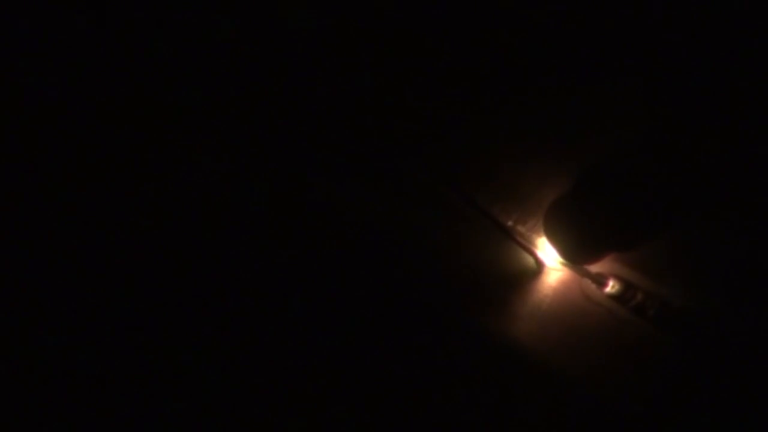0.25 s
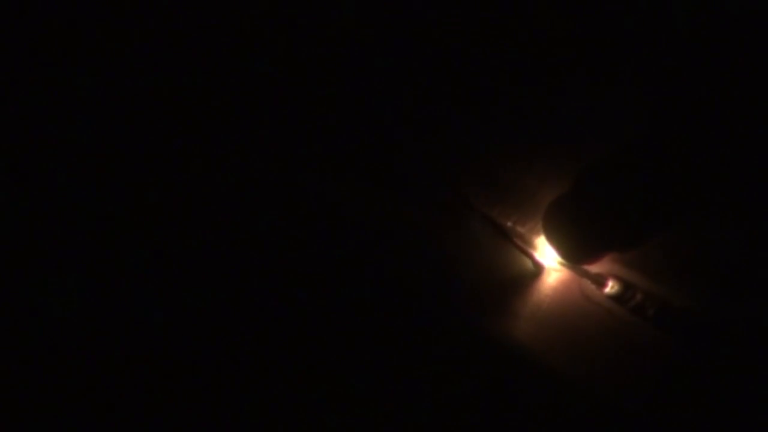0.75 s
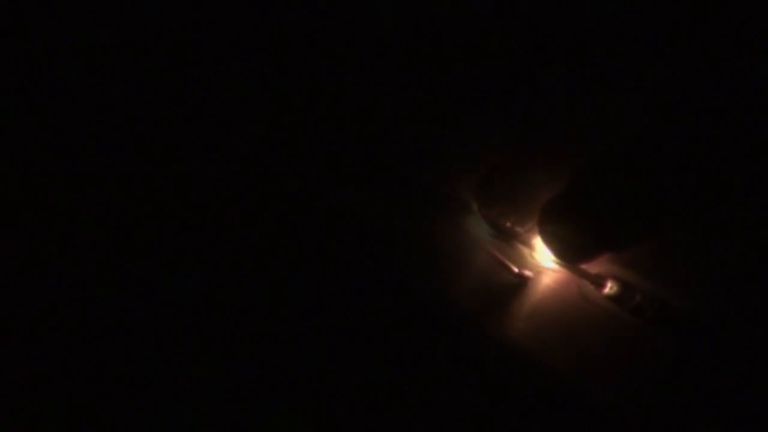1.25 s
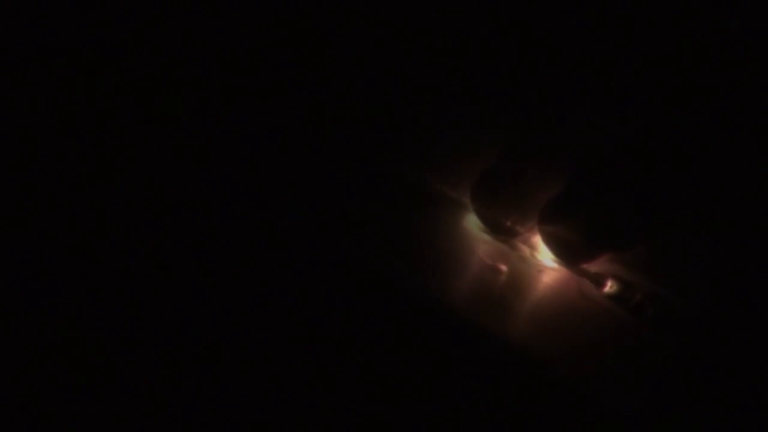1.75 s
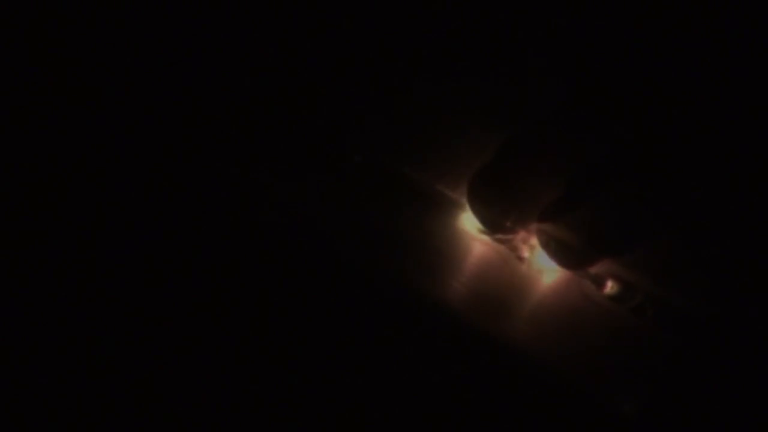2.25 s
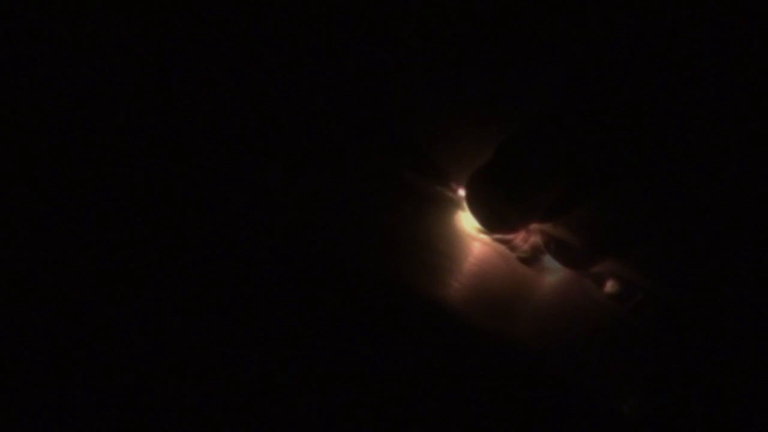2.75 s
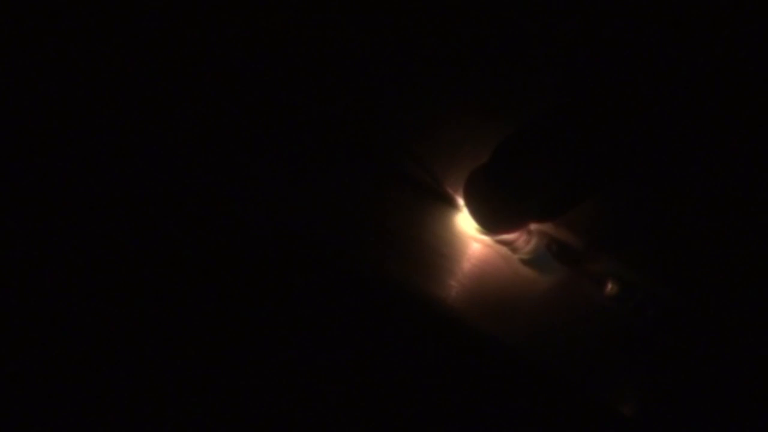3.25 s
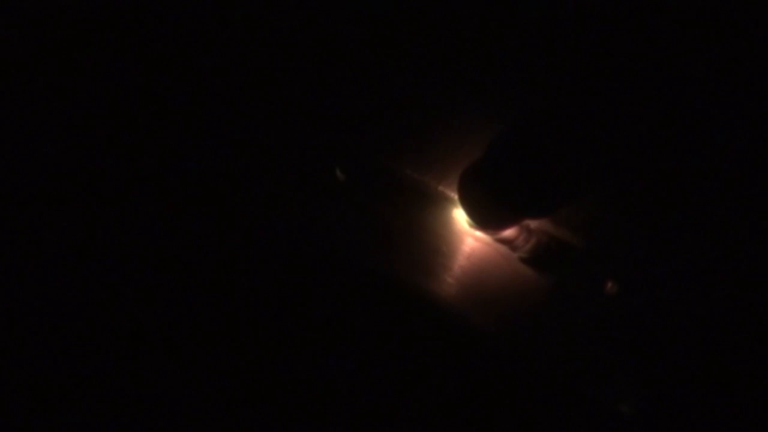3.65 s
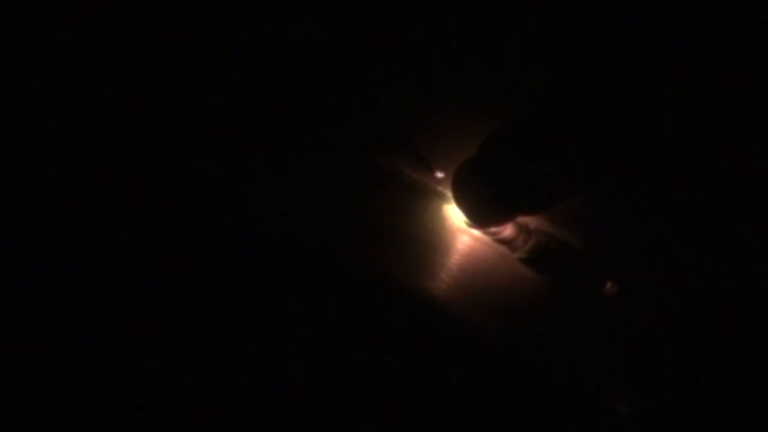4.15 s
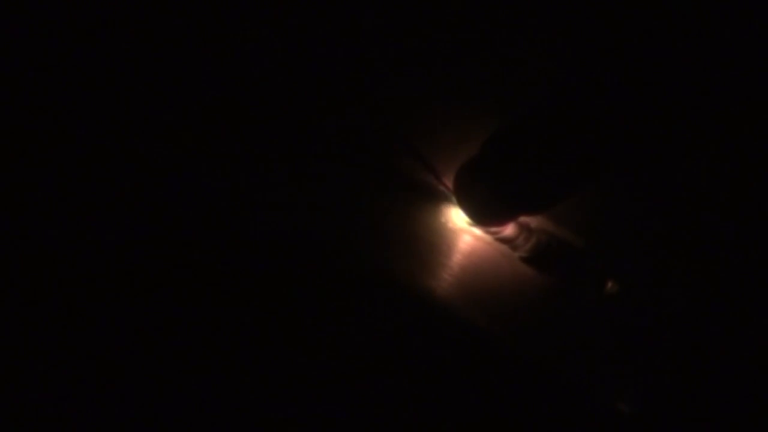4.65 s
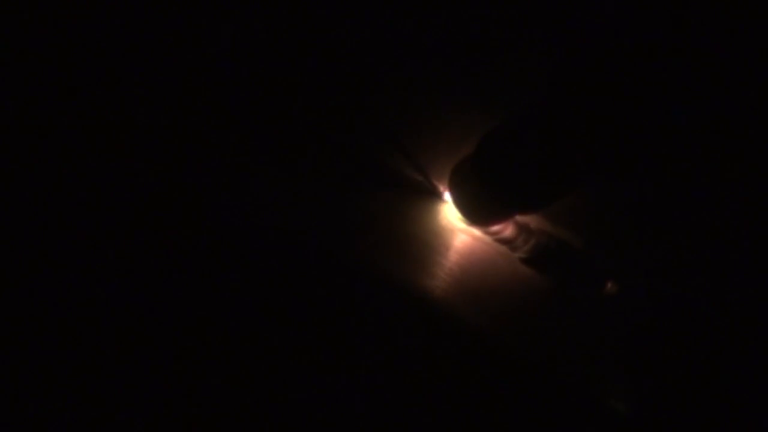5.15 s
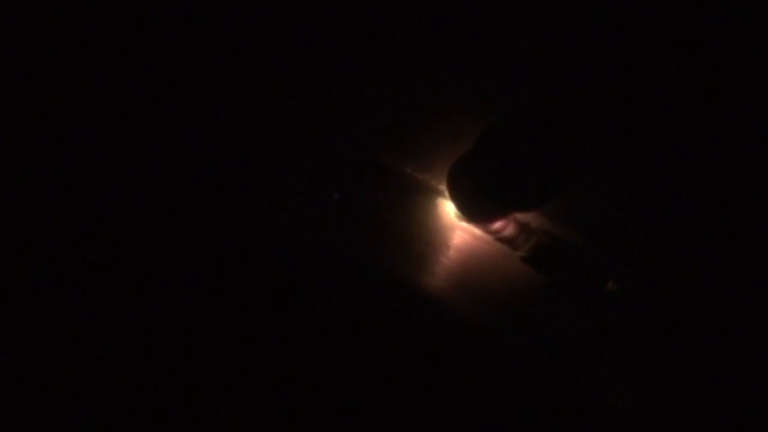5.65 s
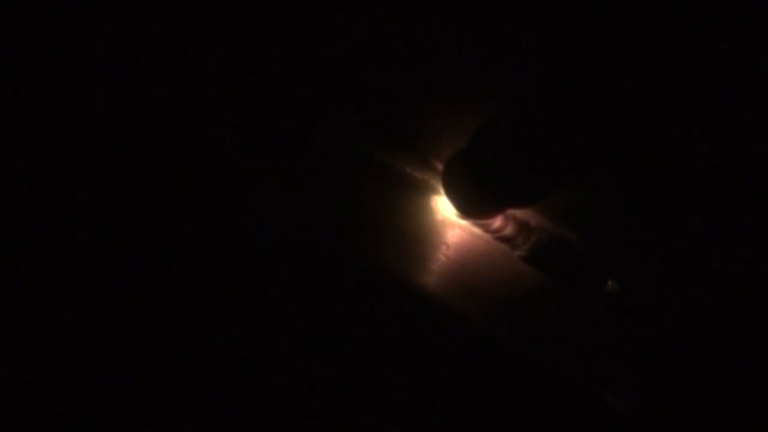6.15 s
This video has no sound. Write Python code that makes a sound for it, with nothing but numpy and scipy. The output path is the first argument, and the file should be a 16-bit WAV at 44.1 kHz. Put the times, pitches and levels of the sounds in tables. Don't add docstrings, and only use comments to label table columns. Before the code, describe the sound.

From 0 s a welding arc on aluminum is already buzzing at full strength, close to a small microphone with little bass. About 106 cycles a second, each with two sharp snaps, fuse into a harsh, nasal, constant-pitch rasp, colored by very short reflections off the metal. Until about 0.8 s it is especially even. From there a second torch pass slowly blends in, roughly equal by 2.6 s and dominant by 3.5 s, so the buzz becomes a little harder, brighter and less steady without any gap. Scattered thin clicks from harder snaps appear from about 1.4 s, with stronger ones near 2.8, 3.4, 5.0 and 5.5 s. Fine gas hiss, sputter and weak cooler hum remain underneath, with only slight room reverberation. Loudness sinks very slightly until 5.75 s, lifts a touch, and the buzz is still running at about 6.4 s.

```python
import sys
import numpy as np
from scipy import signal
from scipy.fft import rfft, irfft
from scipy.io import wavfile
from scipy.ndimage import uniform_filter1d, minimum_filter1d

SR = 44100
rng = np.random.default_rng(int(sys.argv[2]) if len(sys.argv) > 2 else 0)


def to_wav(sig):
    pcm = np.clip(np.atleast_2d(sig), -1, 1) * 32767
    pcm = np.round(pcm).astype(np.int16)
    wavfile.write(sys.argv[1], SR, pcm.T)


def ratio_of_db(decibels):
    return 10 ** (np.asarray(decibels, float) / 20)


N = 282681
ARC_HZ = 105.634
LATE_RESTRIKES_S = 2

# delay_ms, level_db
FRONT_GLINTS = [
    (0.08, 3.5),
    (.85, 1.5),
    (2.7, -3),
    (4.8, -13),
    (6.3, -2),
]


def torch_pass(cycles, hard_s, echoes, shake, edge_db):
    jitter_us, size_db, wander_us, breathe_db, front_db = shake
    count = len(cycles)
    arrive_s = cycles + jitter_us / 1e6 * rng.standard_normal(count)

    delay_ms, strength = np.transpose(echoes)
    reflected = (delay_ms > .2)[:, None]
    wander_s = wander_us / 1e6 * reflected * drift(count, len(echoes), smooth=20.0)
    path_s = delay_ms[:, None] / 1000 + wander_s
    breathing_db = breathe_db * reflected * drift(count, len(echoes), smooth=2.3)
    gains = strength[:, None] * ratio_of_db(breathing_db)

    bite_db = front_db * rng.standard_normal(count)
    push_db, pull_db, push_follows, boost_db = .8, -1.9, .45, 3.0
    hard_db = push_db + push_follows * bite_db
    hard_db[nearest(cycles, hard_s)] = push_db + boost_db
    push = (delay_ms < .06)[:, None]
    first_db = push * hard_db + (~push & ~reflected) * pull_db

    first, _ = reversal(arrive_s, jitter_us, size_db, path_s, gains, first_db)
    second_s = arrive_s + 3.424 / 1000
    second, second_s = reversal(second_s, jitter_us, 2 * size_db, path_s, gains, 0)
    softer = signal.lfilter(*signal.butter(1, 5000, fs=SR), second)

    crossover_hz = 10300
    low = signal.butter(6, crossover_hz, fs=SR, output="sos")
    high = signal.butter(6, crossover_hz, "high", fs=SR, output="sos")
    body = signal.sosfiltfilt(low, first - softer)
    edges = steep_fronts(arrive_s, edge_db + bite_db)
    return body + sputter(second_s) + signal.sosfilt(high, edges)


def reversal(s, jitter_us, size_db, path_s, gains, level_db):
    luck = rng.standard_normal((len(s), 2))
    fired_s = s + jitter_us / 1e6 * luck[:, 0]
    snaps = np.zeros(N)
    add(snaps, fired_s + path_s, gains * ratio_of_db(size_db * luck[:, 1] + level_db))
    return snaps, fired_s


def steep_fronts(arrive_s, hardness_db):
    glint_ms, glint_db = np.transpose(FRONT_GLINTS)[:, :, None]
    shimmer_s = 14e-6 * rng.standard_normal((len(FRONT_GLINTS), len(arrive_s)))
    edges = np.zeros(N)
    add(edges, arrive_s + shimmer_s + glint_ms / 1000, ratio_of_db(glint_db + hardness_db))
    return edges


def sputter(s):
    t60_s = .018
    puffs = np.zeros(N)
    add(puffs, s, ratio_of_db(-25.5 + 1.5 * rng.standard_normal(len(s))))
    dying = signal.lfilter([1], [1, -ratio_of_db(-60 / t60_s / SR)], puffs)
    return signal.lfilter(*signal.butter(1, 4500, fs=SR), dying * rng.standard_normal(N))


# delay_ms, strength (signed)
EARLY_REFLECTIONS = [(0.0, -0.3), (0.034, -0.31), (0.074, 0.37), (0.108, 0.29), (0.17, 0.18),
                     (0.607, -0.18), (0.76, -0.08), (0.839, 0.19), (1.117, 0.08), (1.202, 0.24),
                     (1.4, 0.08), (1.967, 0.09), (2.392, 0.08), (2.494, -0.15), (2.693, -0.2),
                     (2.891, -0.16), (2.971, 0.17), (3.35, 0.1), (3.764, -0.09), (3.895, 0.15),
                     (4.257, -0.09), (4.405, 0.17), (4.796, 0.28), (4.881, -0.17), (4.96, 0.23),
                     (5.023, -0.13), (5.805, -0.15), (6.315, -0.15), (7.058, -0.1), (9.189, 0.08)]


def early_pass():
    hard_s = np.transpose(HARD_RESTRIKES)[0]
    shake = (6, .25, 2, .4, 1.2)
    hard_s = hard_s[hard_s < LATE_RESTRIKES_S]
    return ratio_of_db(-0.5) * torch_pass(early_arrivals(), hard_s, EARLY_REFLECTIONS, shake, edge_db=1.0)


# delay_ms, strength (signed)
LATE_REFLECTIONS = [(0.011, -0.35), (0.04, -0.36), (0.079, 0.41), (0.113, 0.19), (0.164, 0.21),
                    (0.283, 0.11), (0.488, 0.07), (0.618, -0.25), (0.845, 0.2), (0.958, -0.14),
                    (1.162, 0.2), (1.338, 0.09), (1.457, 0.13), (1.644, 0.13), (2.08, 0.1), (2.404, 0.08),
                    (2.489, -0.14), (2.664, -0.19), (2.965, 0.13), (3.73, -0.09), (3.872, 0.12),
                    (4.433, 0.1), (4.58, -0.1), (4.79, 0.23), (4.87, -0.16), (4.955, 0.12), (5.289, -0.09),
                    (5.471, 0.09), (5.788, -0.12), (7.08, -0.09)]


def late_pass():
    hard_s = np.transpose(HARD_RESTRIKES)[0]
    shake = (6, .65, 4, .7, 2.0)
    hard_s = hard_s[hard_s > LATE_RESTRIKES_S]
    return ratio_of_db(0.58) * torch_pass(late_arrivals(), hard_s, LATE_REFLECTIONS, shake, edge_db=3.5)


# start_s, lag_ms
EARLY_TRAVEL = [(.03, 3.343), (2.45, 2.711), (2.79, 2.574), (2.96, 2.642), (3.06, 2.562), (3.27, 2.539),
                (3.43, 2.661)]
# start_s, added_lag_us
EARLY_ROOT_HOPS = [
    (.843, 26),
    (1.581, 91),
    (1.751, 87),
    (1.865, 90),
    (2.054, 118),
    (2.509, -35),
]


def early_arrivals():
    return arrivals(EARLY_TRAVEL, EARLY_ROOT_HOPS)


# start_s, lag_ms
LATE_TRAVEL = [(.95, 4.78), (1.77, 4.97), (2, 4.99), (2.5, 5.19), (2.95, 5.275), (3.33, 5.41), (3.95, 5.44),
               (4.21, 5.4), (4.38, 5.43), (4.58, 5.355), (5.07, 5.37), (5.25, 5.315), (5.89, 5.4),
               (6.36, 5.4)]
# start_s, added_lag_us
LATE_ROOT_HOPS = [
    (2.582, 65),
    (2.622, 90),
    (3.22, 60),
    (3.752, 45),
    (3.855, 50),
    (3.885, 60),
    (4.207, 40),
    (4.262, 95),
    (4.858, 60),
    (5.332, 48),
]


def late_arrivals():
    return arrivals(LATE_TRAVEL, LATE_ROOT_HOPS)


def arrivals(travel, hops):
    cycles = np.arange(int(N / SR * ARC_HZ)) / ARC_HZ
    steps = [(s, us, .025) for s, us in hops]
    steps += [(s, -90, .1) for s in np.arange(.397, N / SR, .503)]
    lag_ms = np.interp(cycles, *np.transpose(travel)) - .17
    for s, us, rise_s in steps:
        lag_ms += us / 1000 * np.clip((cycles - s) / rise_s, 0, 1)
    return cycles + lag_ms / 1000


def nearest(arrive_s, s):
    return np.abs(arrive_s[:, None] - s).argmin(axis=0)


def drift(count, rows, smooth):
    r = np.exp(-1 / max(smooth, .1))
    chance = rng.standard_normal((rows, count + 200))
    slow = signal.lfilter([1], [1, -r], chance)[:, 200:]
    return slow * np.sqrt(1 - r * r)


def add(out, s, sizes):
    at = np.clip(s.ravel() * SR, 8, N - 9)
    taps = np.floor(at)[:, None] + np.arange(-7, 9)
    off = taps - at[:, None]
    shape = np.sinc(off) * np.cos(np.pi * off / 16) ** 2 * sizes.ravel()[:, None]
    out += np.bincount(taps.astype(int).ravel(), shape.ravel(), N + 16)[:N]


# start_s, tick_peak_db
HARD_RESTRIKES = [(1.432, -35), (1.498, -34), (1.555, -34), (1.915, -30), (2.135, -31), (2.589, -34),
                  (2.608, -31), (2.826, -24), (2.873, -29), (3.233, -33), (3.394, -26), (3.413, -32),
                  (3.546, -29), (3.64, -27), (3.82, -33), (3.868, -32), (4.54, -32), (4.559, -34),
                  (4.729, -34), (4.852, -33), (4.994, -28), (5.013, -26), (5.24, -36), (5.477, -24),
                  (5.496, -31), (5.534, -30), (5.732, -30), (6.12, -31), (6.158, -29), (6.376, -35)]


def overloads():
    delay_s = .11 / 1000
    s, db = np.transpose(HARD_RESTRIKES)
    early, late = early_arrivals(), late_arrivals()
    tip_s = np.where(s < LATE_RESTRIKES_S, early[nearest(early, s)], late[nearest(late, s)])
    out = np.zeros(N)
    add(out, tip_s + delay_s, -ratio_of_db(db + 18.0))
    graze_db = -33.0 + 6.0 * rng.standard_normal(len(late))
    add(out, late + delay_s, -np.sqrt(late_share(late)) * ratio_of_db(graze_db))
    return out


# start_s, late_share (0-1)
PASS_DISSOLVE = [
    (.75, 0),
    (1.3, 0.27),
    (2, 0.38),
    (2.6, 0.55),
    (3, 0.65),
    (3.5, 0.91),
]


def late_share(s):
    return np.clip(np.interp(s, *np.transpose(PASS_DISSOLVE)), 0, 1)


def workshop(x, t60, wall_hz):
    s = np.arange(int(.6 * SR)) / SR
    tail = rng.standard_normal(len(s)) * ratio_of_db(-60 * s / t60) * (s > .008)
    tail = signal.lfilter(*signal.butter(1, wall_hz, fs=SR), tail)
    return signal.fftconvolve(x, tail / np.sqrt(np.sum(tail ** 2)))[:N]


# pitch_hz, level_db (per Hz)
GAS_SPECTRUM = [(25, 0), (60, 28), (150, 13), (350, 5.5), (700, 11.5), (1500, -9.5), (3500, -3), (5000, 7),
                (7000, 0.5), (9000, 2.5), (12000, 1), (14000, 4), (16000, -2)]


def gas(level_db, flutter_db):
    flutter = ratio_of_db(flutter_db * drift(N, 1, smooth=1200.0)[0])
    hiss = coloured(rng.standard_normal(N), GAS_SPECTRUM)
    return ratio_of_db(level_db) * rms_one(hiss) * flutter


def nozzle():
    bright = signal.butter(4, 8500, "high", fs=SR, output="sos")
    return ratio_of_db(-34) * rms_one(signal.sosfilt(bright, rng.standard_normal(N)))


def rms_one(x):
    return x / np.sqrt(np.mean(x ** 2) + 1e-20)


# pitch_hz, level_db
COOLER_LINES = [(54, -72), (105.6, -62), (262.7, -55), (282.1, -58), (316.9, -48.5), (422.5, -95),
                (525.3, -46), (788, -44.5), (845.1, -44.5), (1162, -44), (1313.4, -44), (1838.8, -44),
                (2007, -64), (2256.8, -105), (2364, -89)]


def cooler():
    s = np.arange(N) / SR
    wobble = ratio_of_db(1.0 * drift(N, len(COOLER_LINES), smooth=4200.0))
    hum = np.zeros(N)
    for (hz, db), sway in zip(COOLER_LINES, wobble):
        hum += ratio_of_db(db + 2.5) * sway * np.sin(2 * np.pi * hz * s)
    return hum


# pitch_hz, level_db
CAPSULE_COLOUR = [(50, -59), (200, -26), (600, -15.5), (1000, -6), (2000, -0.5), (3000, 0), (4000, -4.5),
                  (5500, -5.5), (7000, -6), (8800, -19), (10200, -37), (11700, -32), (13300, -42),
                  (15500, -39)]


def microphone(x):
    return coloured(x, CAPSULE_COLOUR)


def coloured(x, points):
    hz, db = np.transpose(points)
    log_hz = np.log(np.fft.rfftfreq(4096, 1 / SR) + 1)
    log_gain = np.interp(log_hz, np.log(hz), db) * np.log(10) / 20
    cepstrum = irfft(log_gain) * np.r_[1, np.full(2047, 2), 1, np.zeros(2047)]
    impulse = irfft(np.exp(rfft(cepstrum)))
    return signal.fftconvolve(x, impulse / np.abs(impulse).max())[:N]


# start_s, level_db
LOUDNESS_COURSE = [
    (0.05, -14.5),
    (0.08, -14),
    (5.75, -16),
    (6.35, -15.5),
]


def loudness(s):
    return ratio_of_db(np.interp(s, *np.transpose(LOUDNESS_COURSE)) + 15.5)


def limiter(x):
    span = int(.5 / 1000 * SR)
    needed = np.minimum(1, .99 / (np.abs(x) + 1e-9))
    gain = minimum_filter1d(needed, 2 * span + 1)
    return x * uniform_filter1d(uniform_filter1d(gain, span), span)


def scene():
    s = np.arange(N) / SR
    turn = np.pi / 2 * late_share(s)
    arc = np.cos(turn) * early_pass() + np.sin(turn) * late_pass()
    air = arc + ratio_of_db(-26) * workshop(arc, t60=1.0, wall_hz=8100)
    air += gas(level_db=-32.8, flutter_db=1.0) + nozzle()
    return (loudness(s) * microphone(air) + cooler())[None]


def band_limit(x):
    return signal.sosfilt(signal.butter(12, 15770, fs=SR, output="sos"), x)


def record(dry):
    ported = signal.lfilter(*signal.iirnotch(10120, 16, SR), dry)
    rolled = signal.sosfiltfilt(signal.butter(8, 14200, fs=SR, output="sos"), ported)
    top = .995
    mix = np.clip(limiter(rolled) + overloads(), -top, top)
    return band_limit(mix)


dry = scene()
out = record(dry)
to_wav(out)
```